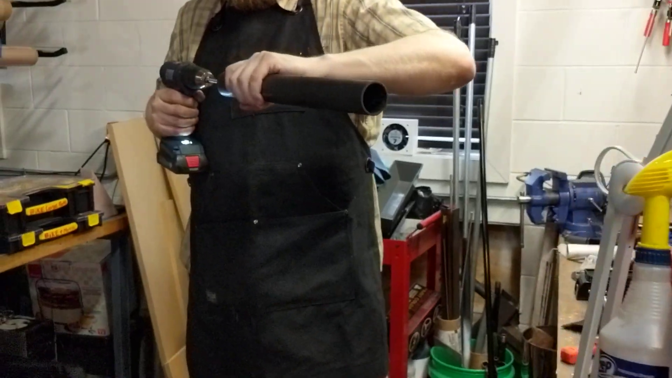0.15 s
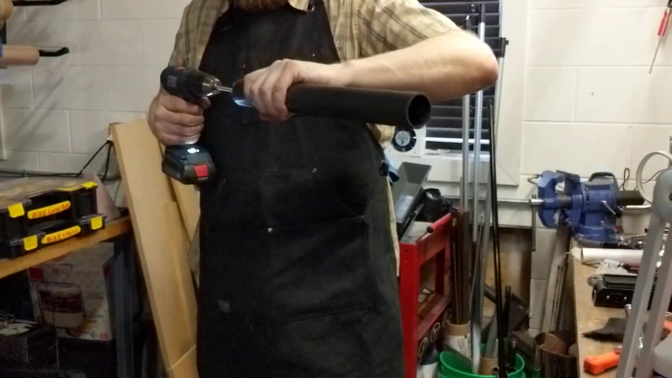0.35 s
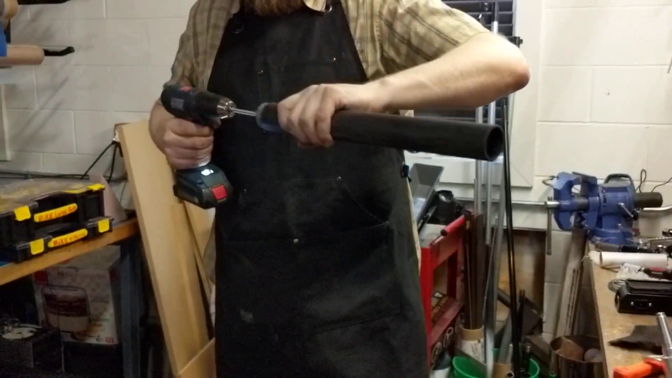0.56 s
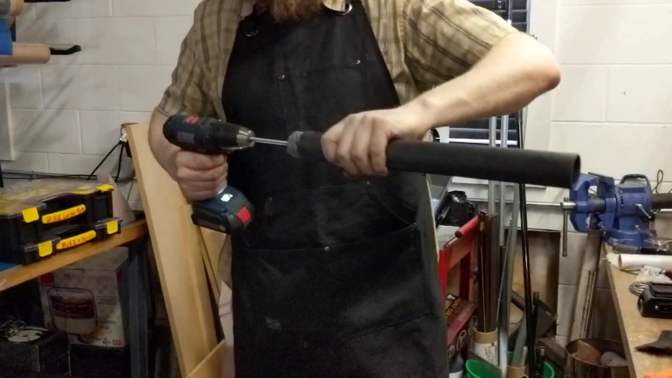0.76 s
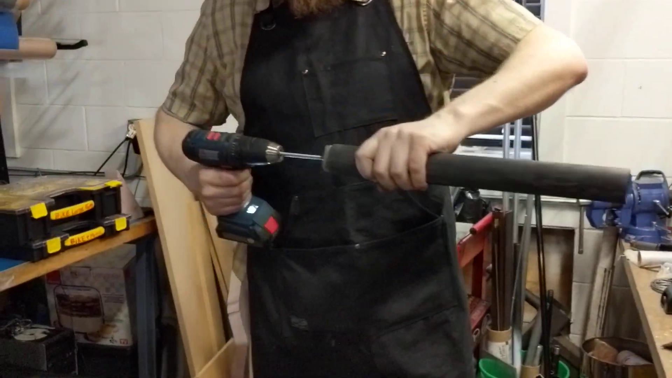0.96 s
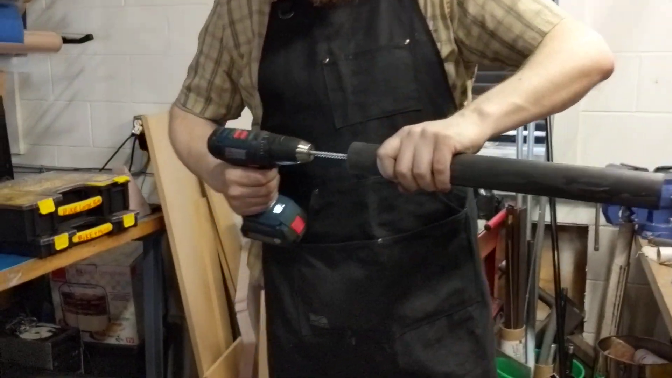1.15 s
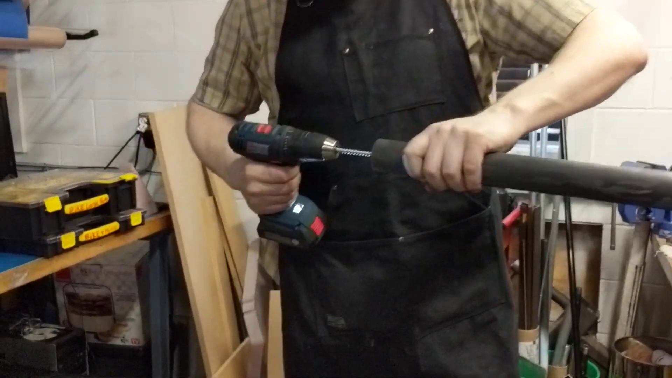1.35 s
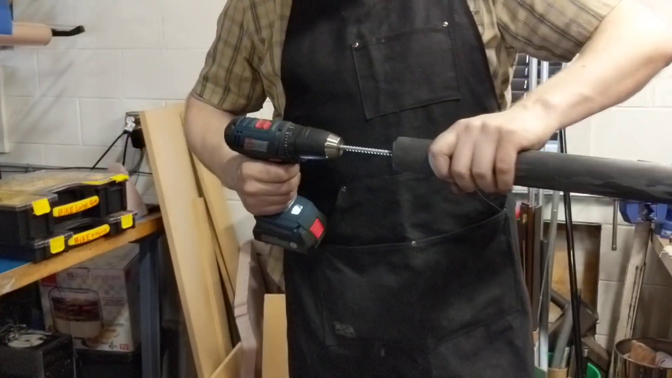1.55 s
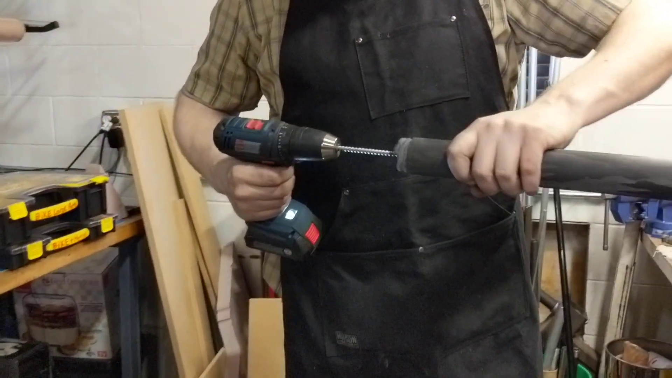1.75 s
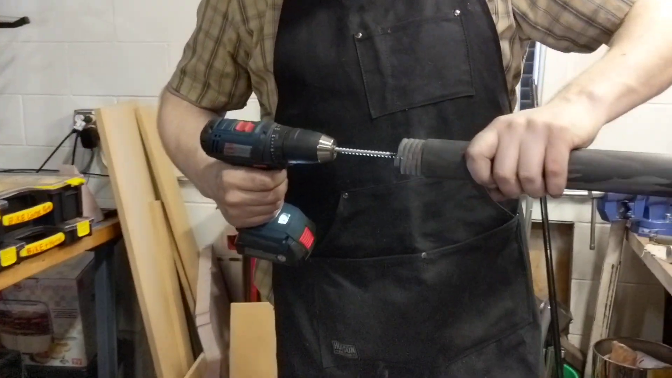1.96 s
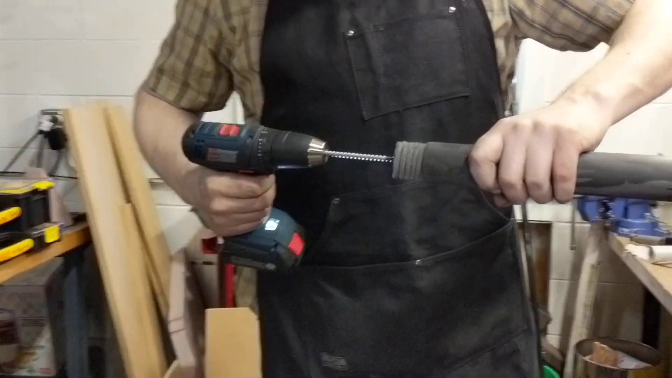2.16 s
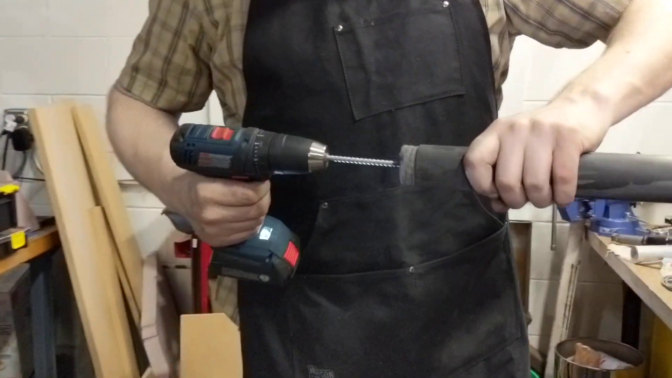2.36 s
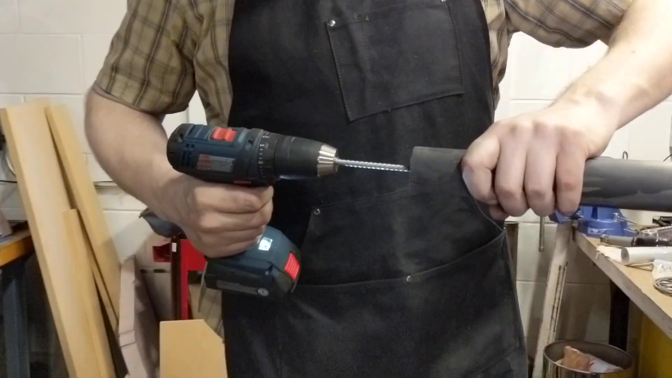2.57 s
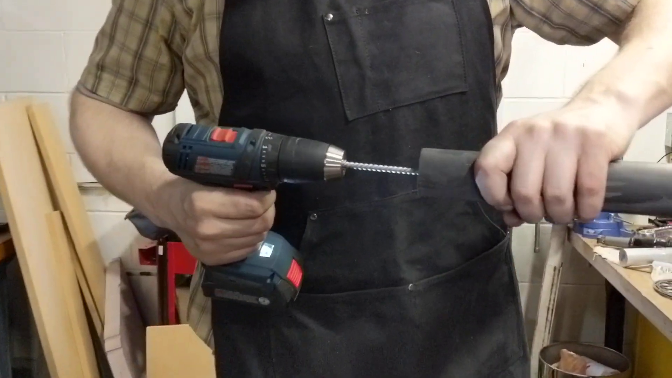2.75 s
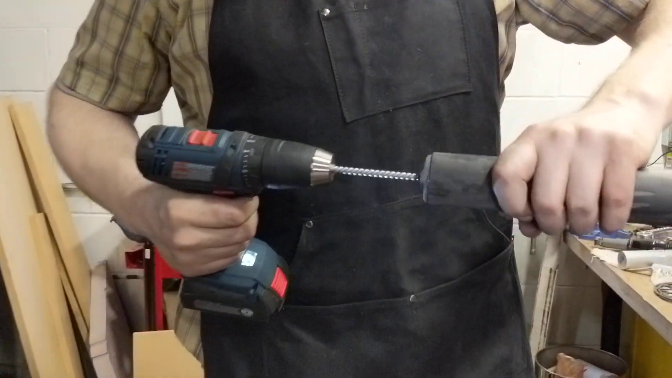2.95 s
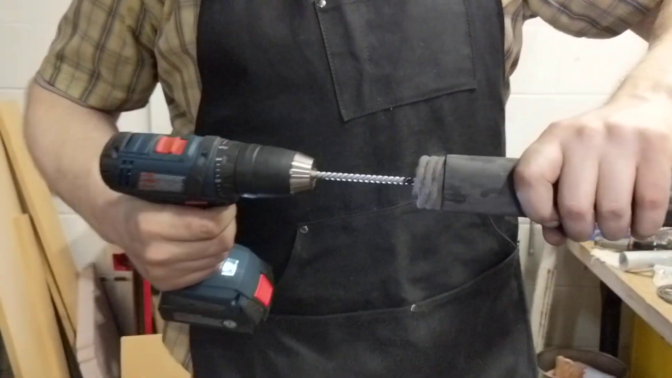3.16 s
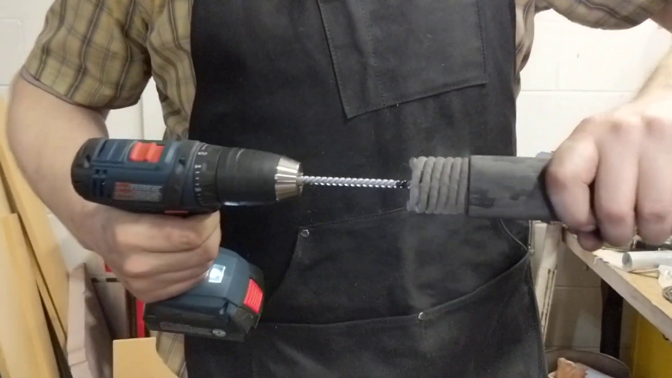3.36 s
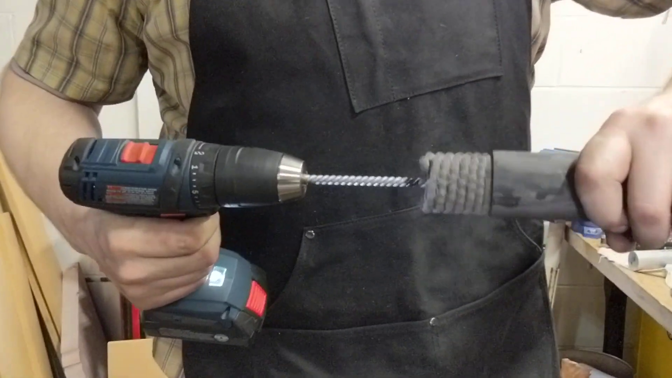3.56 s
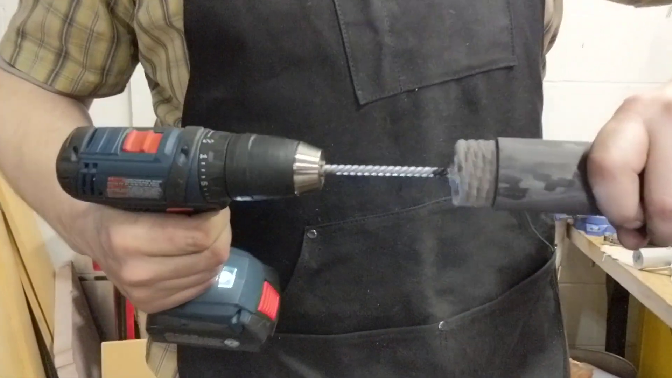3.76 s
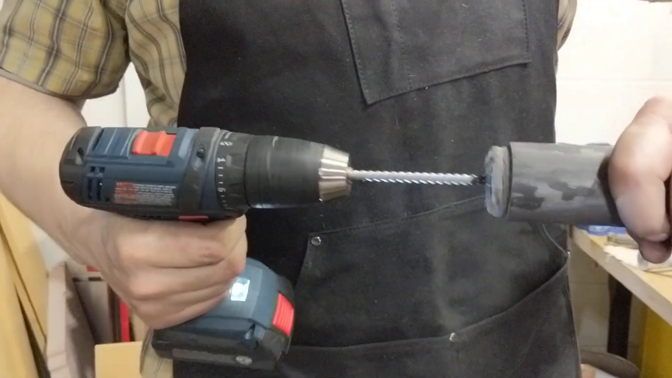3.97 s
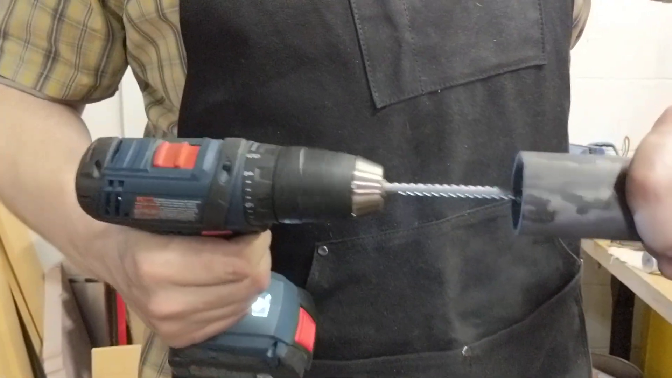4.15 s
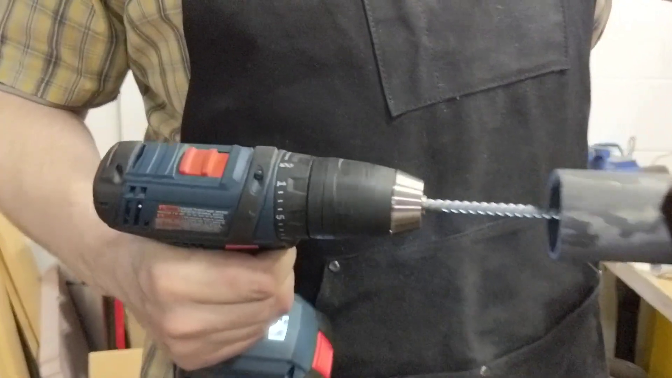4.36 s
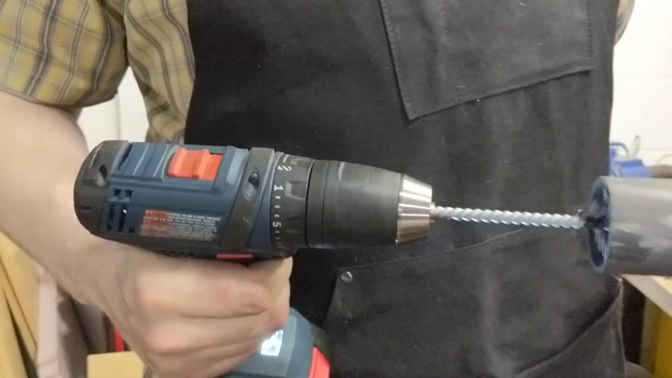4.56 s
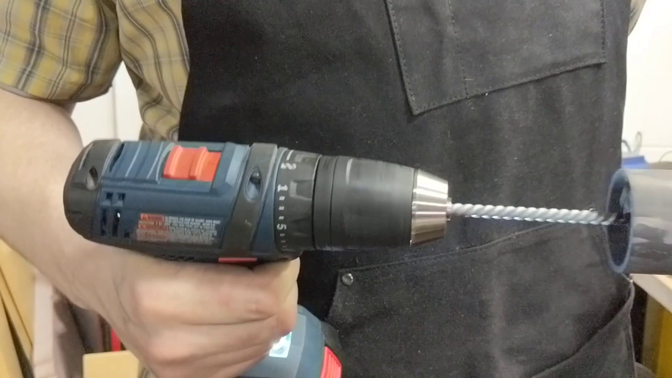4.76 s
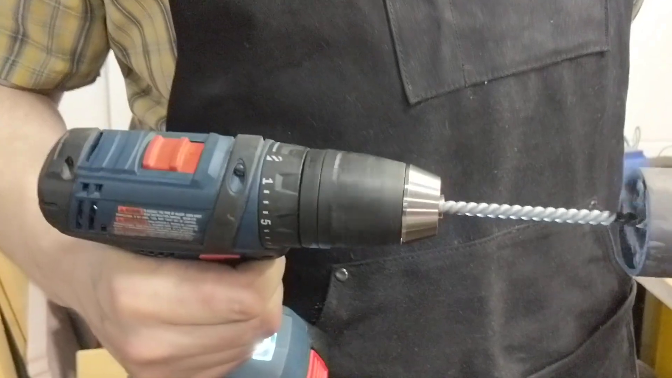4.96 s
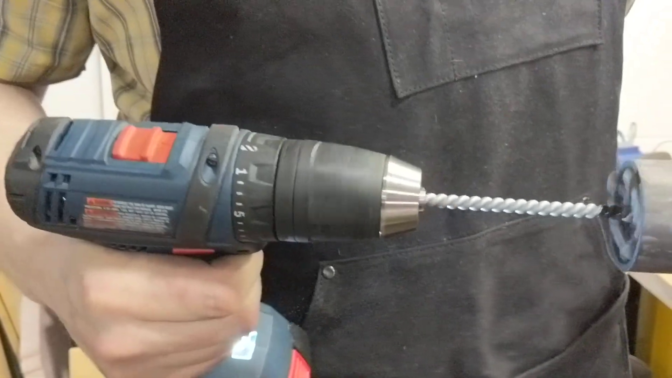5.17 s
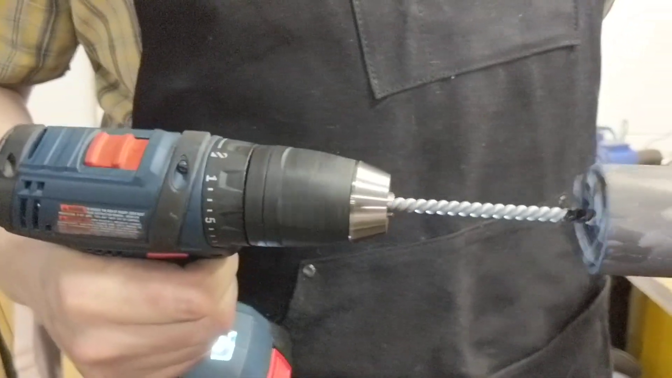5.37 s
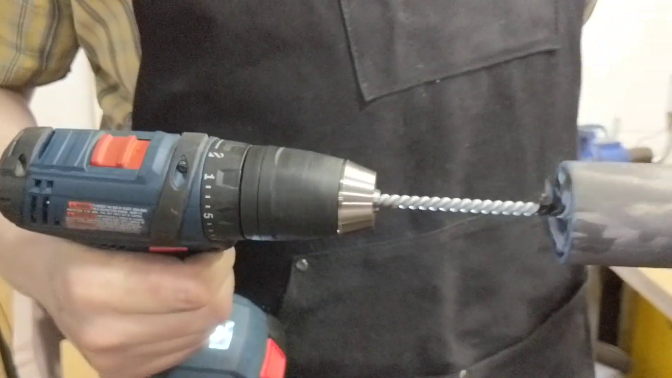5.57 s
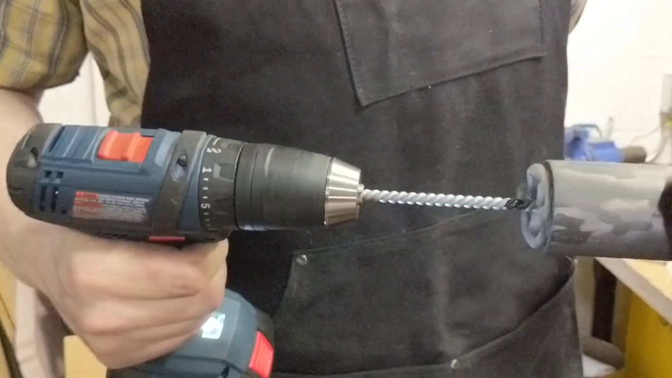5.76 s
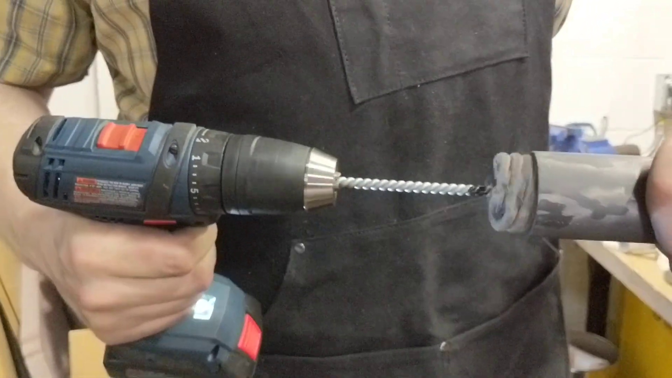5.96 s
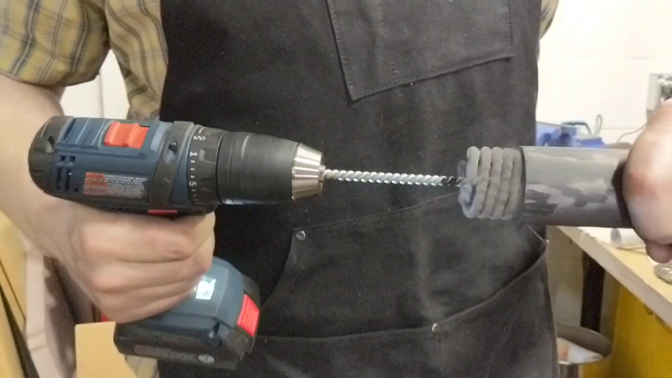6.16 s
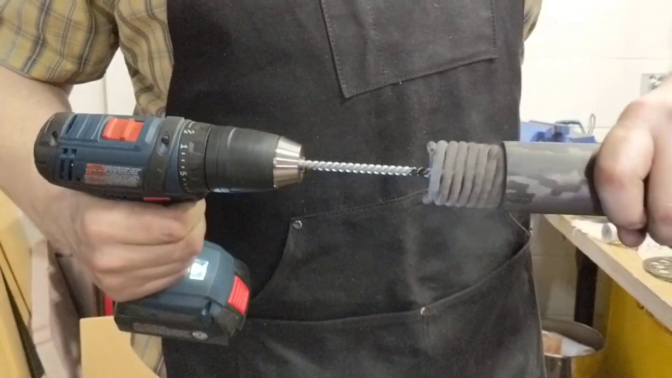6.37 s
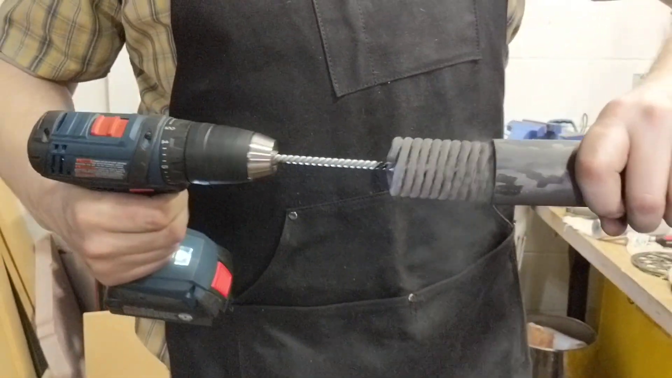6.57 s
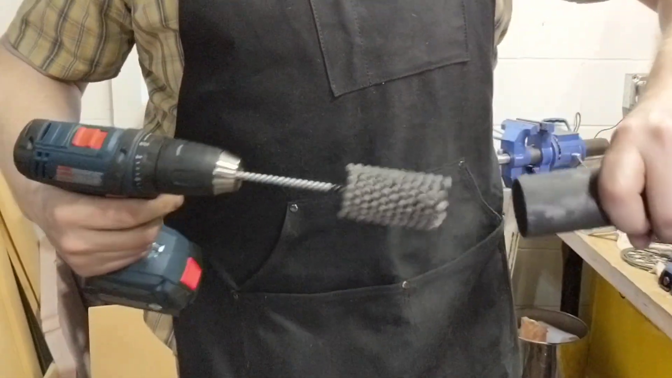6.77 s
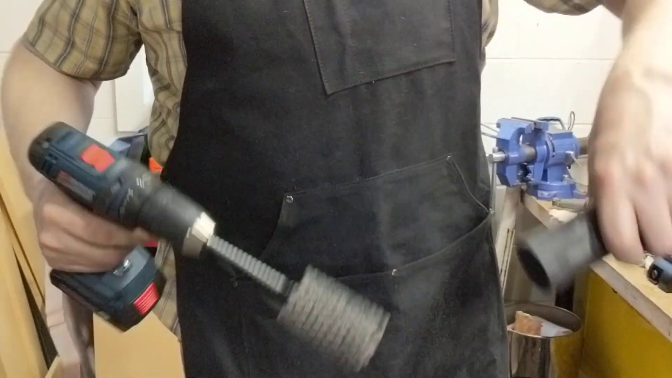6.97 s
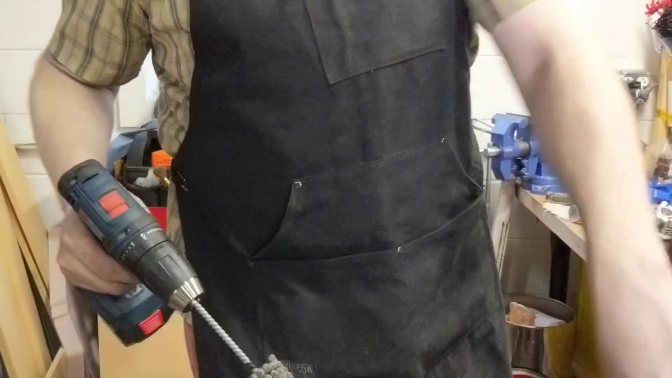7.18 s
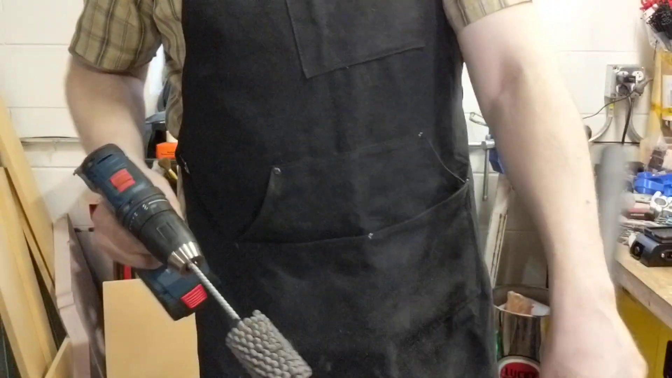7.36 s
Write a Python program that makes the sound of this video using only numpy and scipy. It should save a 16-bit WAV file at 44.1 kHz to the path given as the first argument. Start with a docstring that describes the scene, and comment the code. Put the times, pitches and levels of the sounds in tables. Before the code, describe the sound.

Close-up drill whir with gritty scraping and ringing in a tube, pitch wavering under load, brief looser chatter, sudden stop into low room rumble.

```python
"""A small workshop, in mono from close by: a cordless drill spins a ball hone inside a hand-held tube.
The gear teeth whine as wavering partials that sag in pitch under load; dense impacts rattle in the gearbox.
Abrasive beads scrape the wall and make it ring, the treble hisses near 8.6 kHz, and loose gears slap.
The brake knocks and the drill runs down at once, and the room's low rumble remains."""
import sys
import numpy as np
from scipy import signal
from scipy.fft import rfft, irfft, next_fast_len
from scipy.io import wavfile
from scipy.ndimage import map_coordinates

SR = 44100
rng = np.random.default_rng(int(sys.argv[2]) if len(sys.argv) > 2 else 0)


def generate_wav(sig):
    """Save sig (samples, or channels by samples) to the path in sys.argv[1] as 16-bit PCM at SR."""
    pcm = np.round(np.clip(np.atleast_2d(sig).T, -1, 1) * 32767).astype(np.int16)
    wavfile.write(sys.argv[1], SR, pcm)


N = 327222

MOTOR_RATIO, CHUCK_RATIO = .357, .0245  # turns per gear-tone cycle
EXIT_S = 6.51  # the hone slides clear of the tube


def amp(db):
    """Decibels to gain."""
    return 10 ** (np.asarray(db) / 20)


def unit(x):
    """Scale to rms 1."""
    return x / np.sqrt(np.mean(x ** 2) + 1e-20)


def since(start_s):
    """Seconds elapsed after a moment, 0 before it."""
    return np.maximum(np.arange(N) / SR - start_s, 0)


def along(points, hz):
    """Values of (frequency [Hz], value) points, joined on a log frequency axis."""
    f, v = np.transpose(points)
    return np.interp(np.log(hz + 1), np.log(f + 1), v)


def curves(rows):
    """One value per sample for each column after the time."""
    times, *columns = np.transpose(rows)
    return [np.interp(np.arange(N) / SR, times, column) for column in columns]


def wobble(rate):
    """A smooth random curve, rate knots a second."""
    knots = rng.standard_normal(int(N * rate / SR) + 4)
    return map_coordinates(knots, [np.arange(N) * rate / SR])


def filtered(x, response):
    """x times a response of frequency."""
    size = next_fast_len(N + SR // 2)
    hz = np.fft.rfftfreq(size, 1 / SR)
    return irfft(rfft(x, size) * response(hz), size)[:N]


def coloured(x, spectrum):
    """x through a (frequency [Hz], level [dB]) spectrum, at rms 1."""
    return unit(filtered(x, lambda hz: amp(along(spectrum, hz))))


def ringing(x, modes):
    """x through band-pass resonances of alternating sign, at rms 1."""
    def response(hz):
        total = 0
        for k, (centre, width, db) in enumerate(modes):
            damping = 1j * hz * width
            total = total + (-1) ** k * amp(db) * damping / (centre ** 2 - hz ** 2 + damping)
        return total
    return unit(filtered(x, response))


def grains(per_second, spread_db):
    """Tiny random impacts of uneven size, at rms 1."""
    hit = rng.random(N) < per_second / SR
    size = amp(spread_db * rng.standard_normal(N))
    return unit(hit * rng.standard_normal(N) * size)


# how the gears sing at each speed: (gear tone [Hz], low whine [dB], high whine [dB])
WHINE_AT_SPEED = [(846, -45.5, -34), (856, -39.5, -35), (910, -38.5, -36), (937, -39.5, -37),
                  (964, -41.3, -35), (980, -40, -39), (1039.4, -43, -38)]
# the hone bites and the high whine surges: (centre time [s], half-length to 1/e [s], surge [dB])
BITES = [(1.12, 0.27, 2), (1.6, 0.26, 3), (3.153, .1, 1.5), (4.45, 0.094, 7), (4.8, 0.11, 3.5),
         (5.88, .14, 1)]
WHINE_FADE_DB_PER_S = 50  # once clear of the tube
LOOSE_LOW_DB, LOOSE_HIGH_DB = -2.5, -11.5  # change in the two whines while the gears run loose


def whine_levels(gear_hz, near_db, looseness, near_share=.45, swell_db=1.0):
    """Low and high whine in dB: set by speed, surging as the hone bites, weak while the gears run loose."""
    hz, low_db, high_db = np.transpose(WHINE_AT_SPEED)
    t = np.arange(N) / SR
    bite_db = sum(db * np.exp(-((t - centre) / length) ** 2) for centre, length, db in BITES)
    shared_db = near_share * near_db - WHINE_FADE_DB_PER_S * since(EXIT_S)
    low = np.interp(gear_hz, hz, low_db) + LOOSE_LOW_DB * looseness
    high = np.interp(gear_hz, hz, high_db) + LOOSE_HIGH_DB * looseness + bite_db
    return [db + shared_db + swell_db * wobble(10) for db in (low, high)]


# gear partials: (multiple of the gear tone [ratio], level against the whine [dB], phase waver [rad],
# which whine it follows [0 low .. 1 high])
PARTIALS = [(.367, -24, .9, .1), (.968, -1.5, .42, .1), (1.035, -5, .6, 0), (1.7, -11, 1.4, .5),
            (2, .4, .44, 1), (2.15, -11.5, .9, 1), (2.98, -2.5, .7, .8), (3.97, -4.5, 1.4, .7)]


def whine(cycles, low_db, high_db, low_throb=0.48, high_throb=0.23, flutter_db=1.8):
    """Meshing teeth: wavering partials; the low ones throb most with each turn of the chuck."""
    turn = np.sin(2 * np.pi * cycles * CHUCK_RATIO + 0.99 * wobble(5))
    tone = np.zeros(N)
    for multiple, db, waver, share in PARTIALS:
        phase = 2 * np.pi * multiple * cycles + waver * (wobble(25) + .5 * wobble(130))
        level_db = low_db + share * (high_db - low_db) + db + flutter_db * wobble(60)
        throb = 1 + (low_throb + share * (high_throb - low_throb)) * turn
        tone += amp(level_db) * throb * np.sin(phase)
    return tone


# rattle heard through the gearbox: (frequency [Hz], level per Hz [dB])
GEARBOX = [(100, -48.5), (280, -29.5), (420, -19), (580, -9.5), (760, -9), (950, -7), (1120, -4.5),
           (1350, -1.5), (1600, 2.5), (2150, -3.5), (2900, -4.5), (4200, -5.5), (8000, -18.5), (16000, -57)]


def rattle(shake):
    """Dense small tooth impacts in the gearbox."""
    return coloured(shake * grains(per_second=20000, spread_db=0.5), GEARBOX)


# beads on the tube wall: (frequency [Hz], level per Hz [dB])
GRIT_SPECTRUM = [(300, -45.5), (1000, -16), (2500, -1), (4000, -2), (4400, -4.5), (4900, 0.5), (6200, -.5),
                 (7500, 0.5), (9500, -2), (10500, -13), (13000, -26.5), (16000, -27.5)]
# tube wall resonances: (frequency [Hz], width [Hz], level [dB])
TUBE = [(3400, 130, 1), (3700, 200, -2), (4780, 350, -7)]


def scrape(cycles, shake, ring_db, swing_db=0.6, patchy_db=0.6, ring_flutter_db=2, snag_db=-22):
    """Abrasive beads rub the tube wall, pressed harder once a turn; a few snag and tick, and the wall rings."""
    turn = np.sin(2 * np.pi * cycles * CHUCK_RATIO)
    pressure = shake * amp(swing_db * turn + patchy_db * wobble(45))
    snags = amp(snag_db) * grains(per_second=20, spread_db=0.5)
    grit = coloured(pressure * grains(per_second=30000, spread_db=1) + snags, GRIT_SPECTRUM)
    ring = ringing(pressure * grains(per_second=6000, spread_db=2.5), TUBE)
    return grit + amp(ring_db + ring_flutter_db * wobble(30)) * ring


# treble hiss, peaking at the microphone's resonance near 8.6 kHz: (frequency [Hz], level per Hz [dB])
MIC_PEAK_SPECTRUM = [(3000, -47), (6500, -22), (7700, -8.5), (8300, -1), (8750, 1), (9300, -7.5),
                     (10200, -22.5), (12000, -28.5), (16000, -45)]


def hiss(shake, patchy_db=1.05):
    """The drill's treble hiss, peaking at the microphone's 8.6 kHz resonance: dense patchy grains."""
    fizz = amp(patchy_db * wobble(70)) * grains(per_second=30000, spread_db=2.5)
    return coloured(shake * fizz, MIC_PEAK_SPECTRUM)


def backlash(cycles, gear_hz, decay_s=0.0021, scatter_db=2, drift=.12):
    """Envelope of loose gear teeth slapping about once in two motor turns, at rms 1."""
    slaps = np.abs(cycles * MOTOR_RATIO / 2 + drift * wobble(30))
    size = amp(scatter_db * rng.standard_normal(N))[slaps.astype(int)]
    age_s = slaps % 1 / (gear_hz * MOTOR_RATIO / 2)
    return unit(size * np.exp(-age_s / decay_s))


# gearbox shell struck by the slaps: (frequency [Hz], level per Hz [dB])
SHELL = [(400, -42.5), (900, -12.5), (1300, -5.5), (1650, -8), (2100, -15.5), (4700, -13.5), (7000, -18),
         (8600, -4), (10200, -31), (16000, -55)]


def gear_slaps(slap):
    """Each slap of the teeth is a burst of noise coloured by the gearbox shell."""
    return coloured(slap * rng.standard_normal(N), SHELL)


# the hone is at the tube's mouth, or at last clear of it, and the gears run loose:
# (start [s], end [s], gear slap [dB])
LOOSE_SPELLS = [(3.42, 3.839, -41), (6.12, 6.42, -44), (6.56, 6.74, -34.5)]
LOOSE_EASE_S = 0.12  # time constant of setting in and passing


def loose_running():
    """How loose the gears run with the hone at the mouth or clear (0-1), and the gain of their slap."""
    t = np.arange(N) / SR
    spells, slap_gains = [], []
    for start, end, db in LOOSE_SPELLS:
        outside_s = np.abs(t - np.clip(t, start, end))
        spell = np.exp(-outside_s / LOOSE_EASE_S)
        spells.append(spell)
        slap_gains.append(amp(db) * spell)
    return np.max(spells, axis=0), np.max(slap_gains, axis=0)


# each part's level: (level when nearest and unloaded [dB], rise at load 1 [dB], share of nearness [ratio])
RATTLE_LAW = (-32, 2.63, .65)
SCRAPE_LAW = (-30, 1.5, 0.53)
HISS_LAW = (-26, -0.75, 1.39)
RING_LAW = (-6.5, 1, 1)  # level against the grit of the scrape
SLAP_LAW = (-42, 0, 1.9)


def part_db(law, load, near_db, unsteady_db=.4):
    """A part's level follows load and nearness, a little unsteadily."""
    base_db, load_db, share = law
    return base_db + load_db * load + share * near_db + unsteady_db * wobble(11)


# shaft speed, sagging with each push into the tube: (time [s], gear tone [Hz])
SPEED = [(0, 925), (.3, 907), (.88, 984), (1.05, 960), (1.3, 972), (1.62, 892), (1.78, 915), (2.2, 1022),
         (2.55, 956), (2.8, 933), (3, 886), (3.16, 879.5), (3.55, 1036), (4.1, 948.6), (4.3, 956),
         (4.6, 876), (4.78, 900), (5.05, 854.7), (5.6, 861), (5.98, 838.3), (6.55, 1037), (6.75, 1015)]
# the drill comes nearer the microphone, then draws back; only the drop below the loudest point counts:
# (time [s], level [dB])
LOUDNESS = [(0.0, -30.5), (0.25, -30), (0.55, -31.5), (1.0, -29.5), (1.6, -29.0), (2.15, -30),
            (2.45, -28.1), (3.0, -26.5), (3.55, -29.5), (3.95, -25.5), (4.6, -25.5), (5.35, -24.5),
            (5.9, -26.5), (6.12, -28.5), (6.3, -26.5), (6.75, -33.0)]
FREE_HZ, SAG_HZ = 1058, 200  # unloaded gear tone, and its sag at load 1
WAVER_HZ, WAVER_RATE = 1.8, 14  # the hand's grip wavers the gear tone; changes a second
CONTACT_FADE_DB_PER_S, RING_FADE_DB_PER_S = 12.5, 75  # scrape and rattle, and the ring, once clear
LOOSE_RING_DB = 2.5  # rise of the wall's ring while the gears run loose
RUN_DOWN_START_S = 6.768  # the drill's sound starts to die away


def drill(run_down_s=0.13, steady_depth=0.07, free_depth=0.37):
    """Shaft speed, load and nearness drive every part; at the end all fall 60 dB in run_down_s."""
    gear_hz = curves(SPEED)[0] + WAVER_HZ * wobble(WAVER_RATE)
    cycles = np.cumsum(gear_hz) / SR
    load = (FREE_HZ - gear_hz) / SAG_HZ
    loud_db, = curves(LOUDNESS)
    near_db = loud_db - loud_db.max()
    laws = (RATTLE_LAW, SCRAPE_LAW, HISS_LAW, RING_LAW, SLAP_LAW)
    rattle_db, scrape_db, hiss_db, ring_db, slap_db = [part_db(law, load, near_db) for law in laws]
    looseness, loose_gain = loose_running()
    ring_db = ring_db + LOOSE_RING_DB * looseness - RING_FADE_DB_PER_S * since(EXIT_S)
    contact = amp(-CONTACT_FADE_DB_PER_S * since(EXIT_S))
    play = np.hypot(amp(slap_db), loose_gain)
    slap = backlash(cycles, gear_hz)
    # the freer the gears run, the more their slaps shake rattle, scrape and hiss
    depth = np.clip(steady_depth + free_depth * (play / play.max()) ** 2, 0, 1)
    shake = np.sqrt(1 - depth + depth * slap ** 2)
    sound = whine(cycles, *whine_levels(gear_hz, near_db, looseness))
    sound += contact * amp(rattle_db) * rattle(shake)
    sound += contact * amp(scrape_db) * scrape(cycles, shake, ring_db)
    sound += amp(hiss_db) * hiss(shake)
    sound += play * gear_slaps(slap)
    return sound * amp(-60 * since(RUN_DOWN_START_S) / run_down_s)


# colour of the low rumble: (frequency [Hz], level per Hz [dB])
ROOM_NOISE = [(20, -32), (35, -14.5), (58, -2), (110, -3.5), (146, -6), (190, -4.5), (300, -10),
              (500, -11.5), (1200, -37.5), (4000, -80)]
# colour of the faint steady hiss: (frequency [Hz], level per Hz [dB])
AIR = [(100, -14.5), (500, -2.5), (1200, -4), (2800, -12.5), (6500, -17.5), (8550, -15), (10600, -31),
       (15000, -35)]
# the room's rumble: (time [s], level [dB])
RUMBLE_LEVEL = [(0, -60), (2.1, -62), (3, -64.5), (5.9, -66), (6.68, -63.5), (6.82, -58.5), (7.42, -58.5)]


def room_noise(swell_db=1.6, hum_hz=59.0, hum_db=-12, air_db=-60.5):
    """Restless low rumble with a mains hum in it, and a steady faint hiss."""
    rumble_db, = curves(RUMBLE_LEVEL)
    rumble = amp(swell_db * wobble(14)) * coloured(rng.standard_normal(N), ROOM_NOISE)
    hum_phase = 2 * np.pi * hum_hz * np.arange(N) / SR + .3 * wobble(2.8)
    hum = amp(hum_db) * np.sin(hum_phase)  # level against the rumble
    air = amp(air_db) * coloured(rng.standard_normal(N), AIR)
    return amp(rumble_db) * (rumble + hum) + air


# reverberation of the room: (frequency [Hz], time to fall 60 dB [s])
WORKSHOP = [(200, .35), (1500, 0.29), (5000, 0.57), (12000, 0.33)]


def workshop(x):
    """The cluttered room's short diffuse answer: decaying noise, 5 ms behind the direct sound."""
    hz, t, z = signal.stft(rng.standard_normal(SR // 2), SR, nperseg=256)
    decay = amp(-60 * t / along(WORKSHOP, hz)[:, None])
    tail = signal.istft(z * decay, SR, nperseg=256)[1]
    delayed = np.pad(x, (SR // 200, 0))
    return signal.fftconvolve(delayed, tail / np.linalg.norm(tail))[:N]


# brake knock in the gearbox: (frequency [Hz], level [dB], time to fall 60 dB [s])
BRAKE = [(662, -36, 0.049), (765, -32.5, 0.094), (860, -29, 0.055), (1470, -41, .04)]


def brake(start_s=6.757, attack_s=0.0047):
    """The spindle lock catches with a short hollow knock: decaying sines with a soft attack."""
    t = since(start_s)
    knock = sum(amp(db - 60 * t / t60) * np.sin(2 * np.pi * hz * t) for hz, db, t60 in BRAKE)
    return knock * (1 - np.exp(-t / attack_s))


def scene(wet_db=-11):
    """Drill, brake, room answer and rumble, alike in both channels."""
    tool = drill() + brake()
    mono = tool + amp(wet_db) * workshop(tool) + room_noise()
    return np.array([mono, mono])


TOP_HZ = 15720  # band limit


def record(dry):
    """Nothing is kept from the band limit up."""
    return np.array([filtered(channel, lambda hz: hz < TOP_HZ) for channel in dry])


dry = scene()
out = record(dry)
generate_wav(out)
```